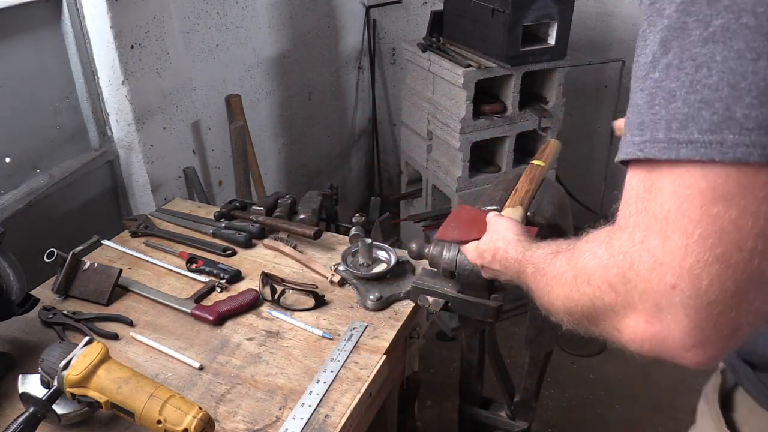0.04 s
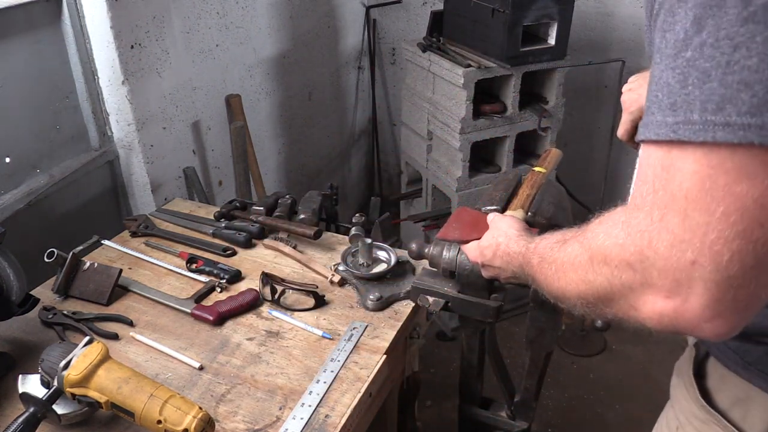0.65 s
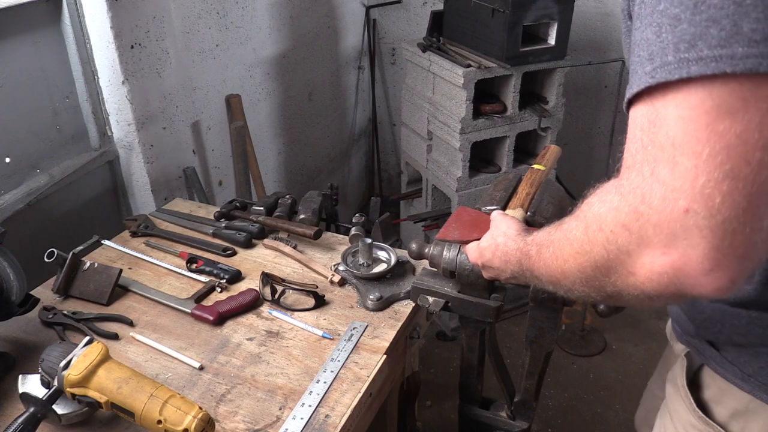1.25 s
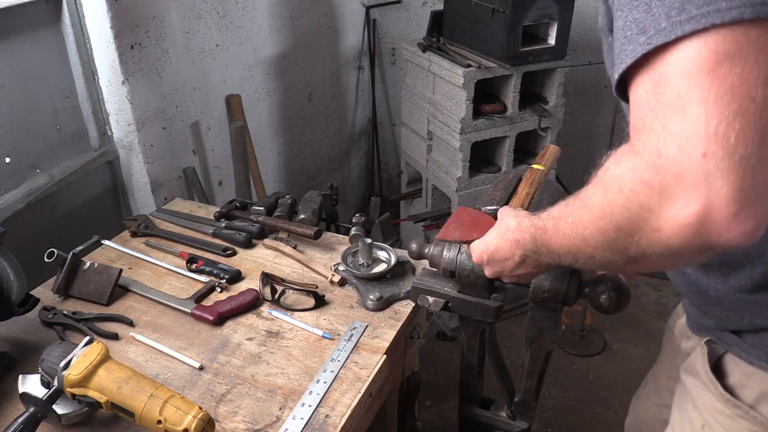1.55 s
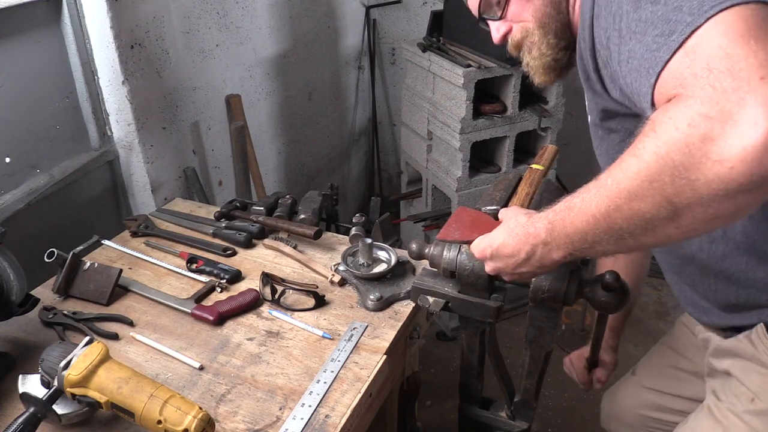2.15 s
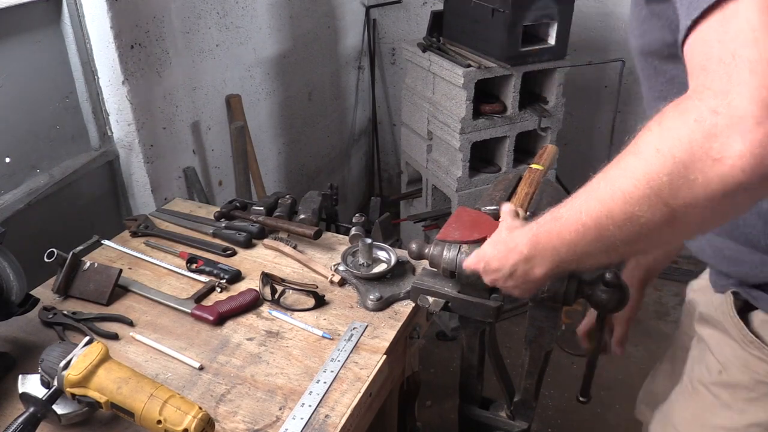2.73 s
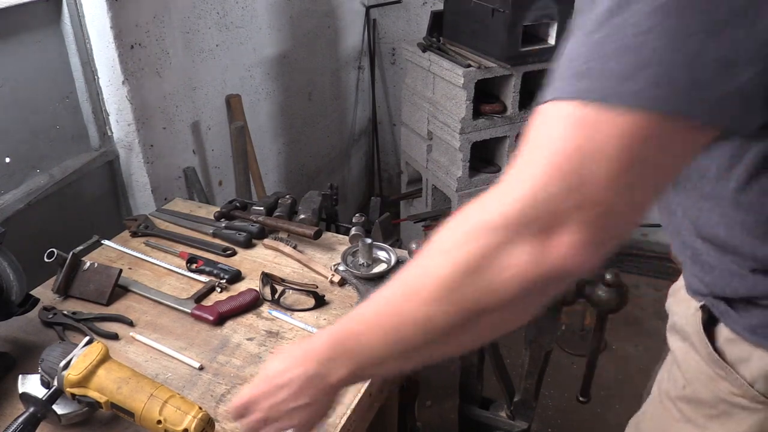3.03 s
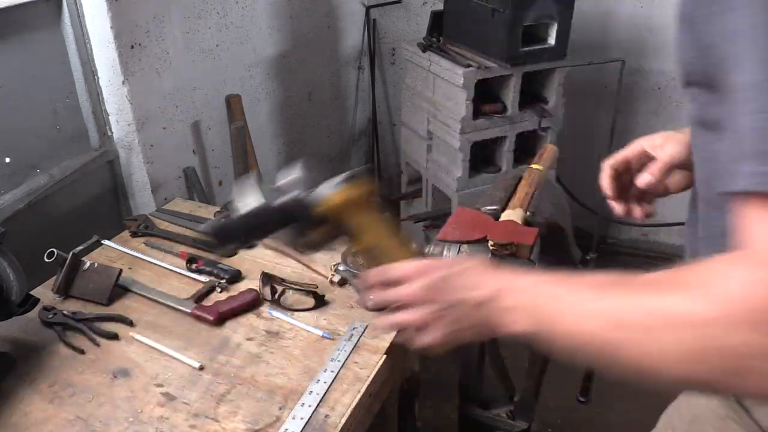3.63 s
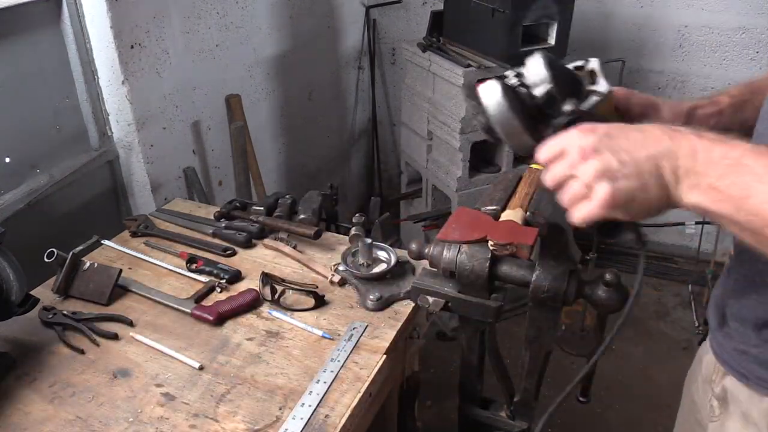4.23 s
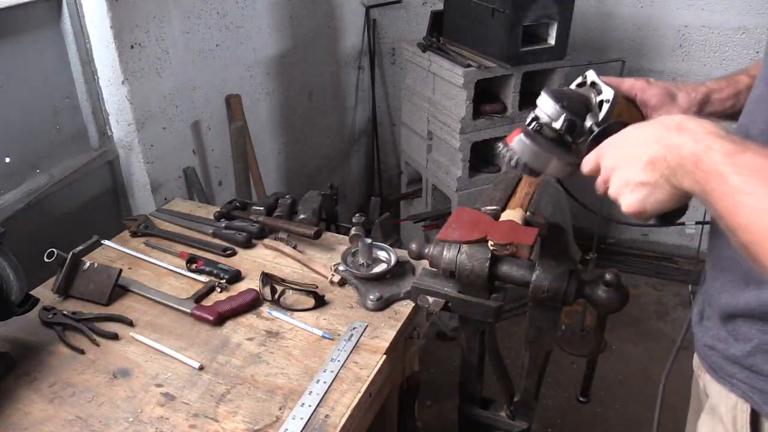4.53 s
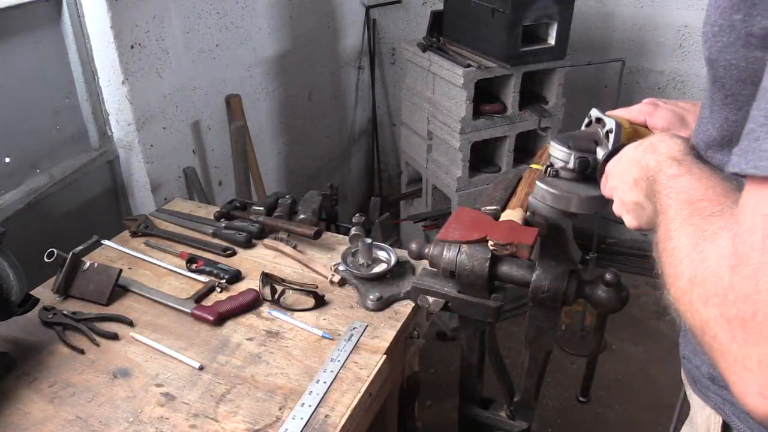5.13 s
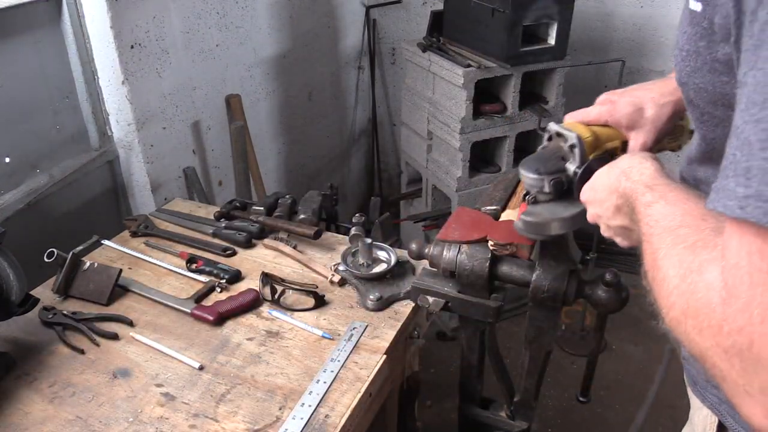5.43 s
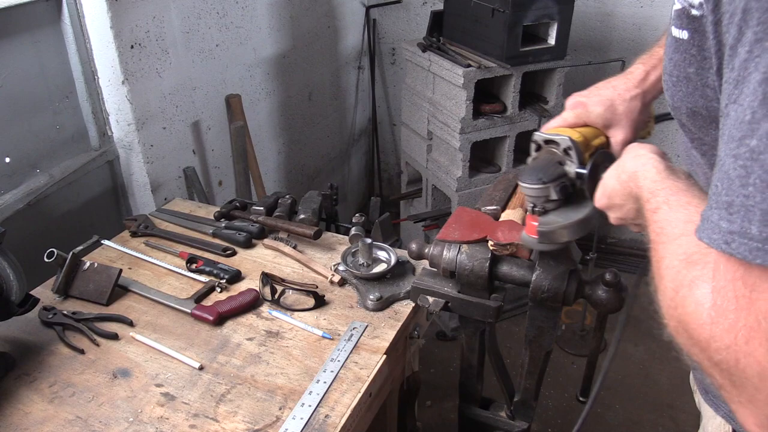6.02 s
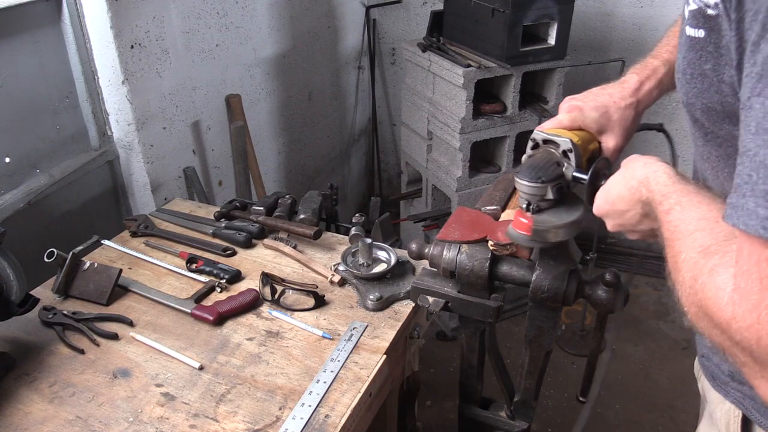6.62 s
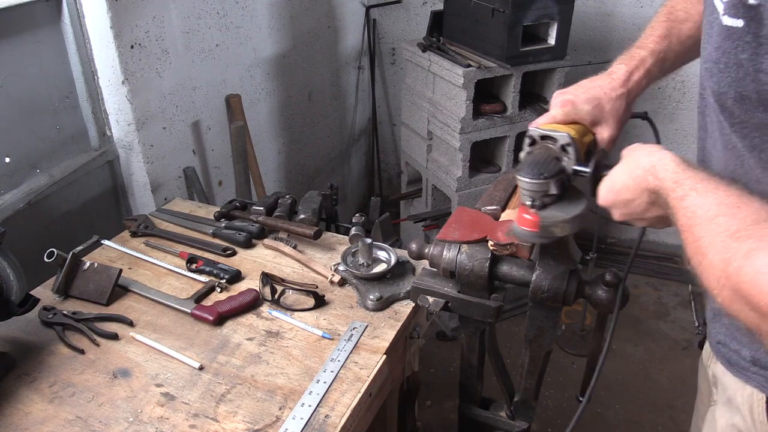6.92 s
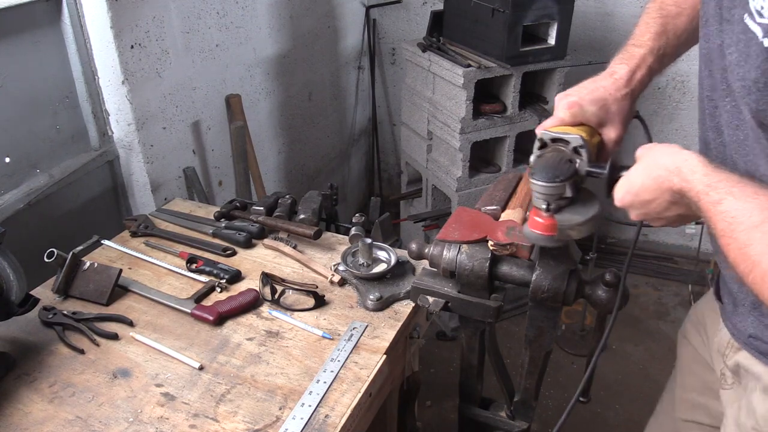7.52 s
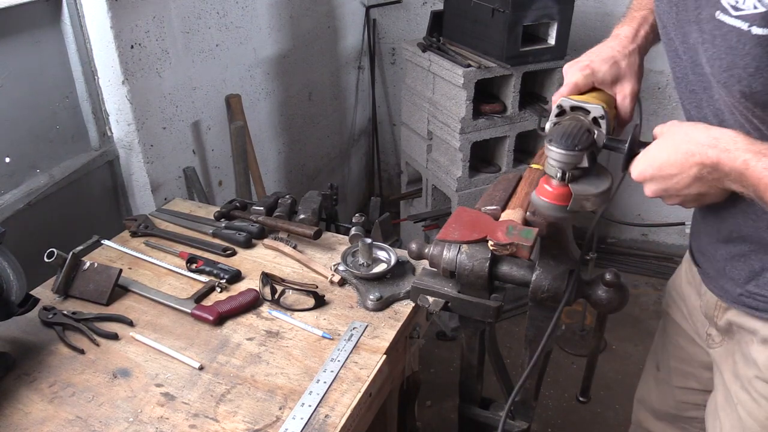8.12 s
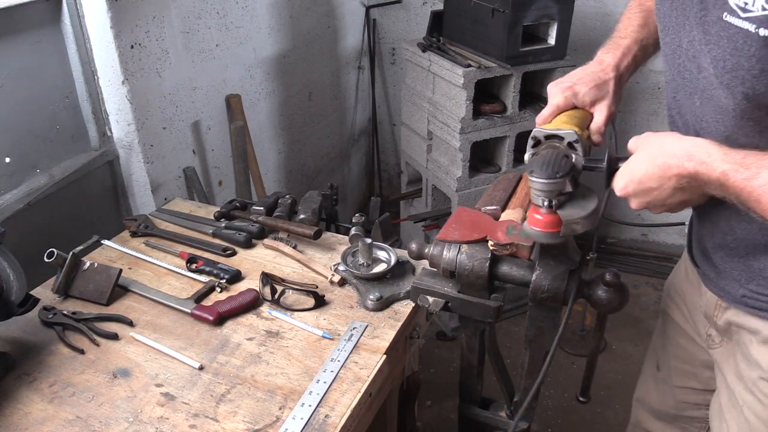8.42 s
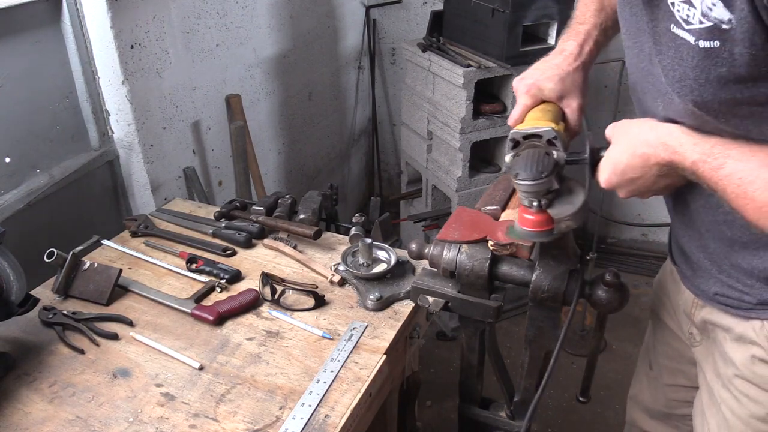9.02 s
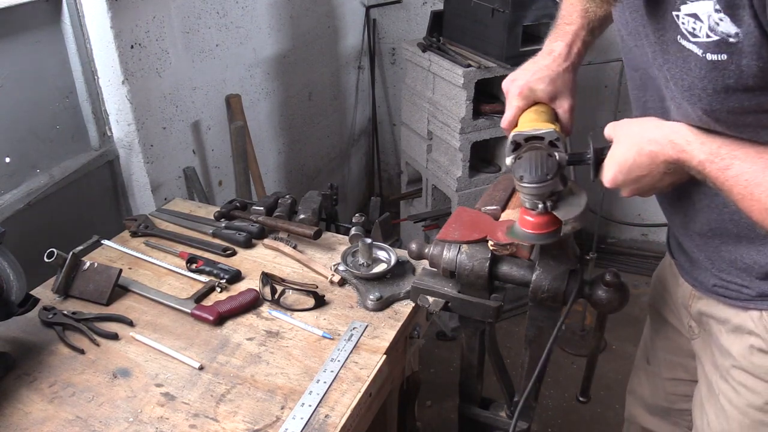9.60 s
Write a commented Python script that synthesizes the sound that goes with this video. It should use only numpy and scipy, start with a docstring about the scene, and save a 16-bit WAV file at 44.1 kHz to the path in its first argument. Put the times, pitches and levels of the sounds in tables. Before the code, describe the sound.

A vise screw turns with faint, thin squeaks while a hatchet clinks and knocks between the steel jaws. Sharper clinks come at about 2 to 2.4 seconds, the screw gives a short groan, and the handle drops with a ringing clank at 2.7. From 3 to 5 seconds an angle grinder is lifted off the bench with light knocks, scrapes and a swish of dragging cord, over a faint low hum.

At about 5.1 seconds the grinder starts with a jolt and spins up into a loud, high whine with rattling gears. From 5.7 its wire brush scratches and rasps on the blade, the pitch sagging and wavering under pressure. Near 7.9 it snags with a sharp knock and speeds up freely, then bites again from 8.5 until the end, near 10 seconds. The grinder sounds close and nearly dry; the vise carries more small workshop echo.

```python
"""A squeaking screw and steel clinks come first: a hatchet is clamped in a vise, the screw groans, the
handle drops. An angle grinder is lifted off the bench, its cord dragging, and starts with a jolt. Its
gears rattle and its motor whines; the speed sags whenever the wire brush bites into the blade.
One microphone in a small workshop: the grinder sounds close and nearly dry, the vise has more of the
room around it. A faint low hum and room noise lie behind."""
import sys
import numpy as np
from scipy import signal
from scipy.fft import rfft, irfft, next_fast_len
from scipy.io import wavfile
from scipy.ndimage import uniform_filter1d

SR = 44100
rng = np.random.default_rng(int(sys.argv[2]) if len(sys.argv) > 2 else 0)


def wrap_up_sound(samples):
    """Save the sound to the file named by the first command line argument, as 16-bit audio."""
    columns = np.atleast_2d(samples).T
    # keep every value between -1 and 1, then stretch to whole-number steps
    tamed = np.clip(columns, -1, 1)
    steps = np.round(tamed * 32767).astype(np.int16)
    wavfile.write(sys.argv[1], SR, steps)


N = 434826
TIME = np.arange(N) / SR
SWITCH_ON_S = 5.085


# spectrum of the gear case: f/Hz, relative level/dB
CASE_SPECTRUM = [(47, -89), (80, -59), (107, -36), (139, -40.5), (177, -28.5), (287, -19.5), (663, -17),
                 (864, -15.5), (1640, -12.5), (2180, -6.5), (3700, -2.5), (4220, -6), (4820, -3.5),
                 (6140, -13), (15500, -23.5)]
# resonances of case and guard: f/Hz, width/Hz, level/dB
CASE_RESONANCES = [(1113, 290, -33), (2220, 170, -36), (4190, 150, -24.5), (5600, 190, -38),
                   (6700, 204, -41.5), (8330, 660, -38.5)]

def gear_rattle(turns, running, press, throb=0.074):
    """Loose teeth clatter in the case, hardest twice a turn and a little softer under load."""
    level = amp(-13 - 1.1 * press + 0.5 * drift(16)) * np.minimum(running / 0.64, 1) ** 4
    force = 1 + throb * np.cos(4 * np.pi * turns) + throb / 2 * np.cos(2 * np.pi * turns)
    force *= amp(drift(1500) + 0.44 * drift(70))
    teeth = force * rng.standard_normal(N)
    mesh = force * wavering(32 * turns, 4, 900)
    modes = sum(amp(db) * ring(teeth, hz, width) for hz, width, db in CASE_RESONANCES)
    return level * (amp(-3) * coloured(teeth, CASE_SPECTRUM) + amp(-11) * mesh) + running * modes


# housing resonances that swell the passing whine: f/Hz, level/dB
HOUSING_RESPONSE = [(8100, -43), (8950, -18.5), (9700, -40), (10650, -44), (11600, -28), (12200, -35),
                    (13000, -30.5), (13650, -25.5), (14050, -29), (14400, -40), (15200, -36)]
# whine at the microphone as the grinder is turned about: t/s, gain/dB
WHINE_AT_MIC = [(7.5, 2), (7.9, -5), (8.5, 1), (9.55, 1), (9.78, -11)]
# low overtones, gear mesh and sidebands: multiple of the spindle speed; relative level/dB
GEAR_ORDERS = [3, 4, 5, 6, 25, 29, 31, 32, 33]
GEAR_LEVELS = [-45.5, -37.5, -42.5, -42, -52, -40, -31.5, -30.5, -29]
# how strongly the case radiates a gear tone: f/Hz, gain/dB
CASE_RESPONSE = [(100, 13), (600, -6.5), (850, 4.5), (1200, 8), (3050, -15), (3400, 10), (3750, 4),
                 (3980, -15), (4260, 5), (4520, 4), (4850, 4.5), (5200, -6)]
# rotor tones: multiple of the motor speed; level/dB at top speed
ROTOR_ORDERS = [1, 11, 12, 13, 15, 18]
ROTOR_LEVELS = [-46, -47.5, -50, -45, -47, -51]

def motor(turns, speed, running, press, gear_ratio=32 / 9, slots=29, sway=0.1278):
    """The rotor slots whine, swayed once a spindle turn, over the tones of rotor and gears."""
    rotor_turns = turns * gear_ratio
    whine_db = lookup(HOUSING_RESPONSE, speed * gear_ratio * slots) + curve(WHINE_AT_MIC)
    whine = amp(whine_db + 1.8 * drift(13)) * wavering(rotor_turns * slots, 0.166, 50)
    whine *= 1 + sway * np.sin(2 * np.pi * turns)
    unbalance = amp(-51) * wavering(turns, 0.19, 14)
    gears = sum(amp(db + lookup(CASE_RESPONSE, order * speed)) * wavering(order * turns, 0.57, 40)
                for order, db in zip(GEAR_ORDERS, GEAR_LEVELS))
    gears *= amp(-3 * press)  # the gears sing most freely without load
    bearings = sum(amp(db) * wavering(order * rotor_turns, 1.3, 160)
                   for order, db in zip(ROTOR_ORDERS, ROTOR_LEVELS))
    return whine * (running > 0) + running ** 2 * (unbalance + gears + bearings)


def spindle_speed(drag, free_speed=154.65, droop=67.7, torque=156.2, hop=22):
    """Turns/s of the spindle: a series motor pulls hardest when slow, not at all at its free speed."""
    steps = np.arange(round(SWITCH_ON_S * SR), N, hop)
    speeds = [0.]
    for braking in drag[steps[:-1]]:
        pull = torque * np.expm1((free_speed - speeds[-1]) / droop)
        speeds.append(speeds[-1] + (pull - braking) * hop / SR)
    return np.interp(np.arange(N), steps, speeds, left=0)


# two passes over the blade, the first ending in a snag at the edge: t/s, braking/(turns/s^2)
BRUSH_PASSES = [(5.513, 0), (5.706, 54), (5.763, 32), (5.905, 97), (5.958, 53), (6.392, 99), (6.432, 84),
                (6.87, 93.5), (6.914, 75.6), (7.75, 90), (7.837, 194), (7.839, 0), (8.406, 0), (8.518, 35),
                (8.756, 88.3), (9.077, 98.8), (9.86, 66.7)]

def blade_drag(rock_s=6.898, rocks=3, rocks_per_s=3.984, swing=27):
    """The blade brakes the brush; for a short spell the hand rocks it to and fro."""
    strokes = np.clip((TIME - rock_s) * rocks_per_s, 0, rocks)
    return curve(BRUSH_PASSES) - swing * np.sin(2 * np.pi * strokes)


# gear clatter under the starting torque: f/Hz, relative level/dB
JOLT_SPECTRUM = [(88, -66), (150, -40.5), (350, -8.5), (624, -12), (701, -2.5), (1800, -7.5), (2400, 2),
                 (5510, -10.5), (7080, -8.5), (8250, -23), (15000, -32)]

def starting_jolt(mains_hz=60, slack_s=0.0081, fade_db_per_s=262):
    """Each half wave of the mains slams the gears together, and they give a short rising squeal."""
    surge = unit(np.exp(0.55 * np.cos(4 * np.pi * mains_hz * (TIME - 5.0957))))
    clatter = coloured(surge * rng.standard_normal(N), JOLT_SPECTRUM)
    squeal_hz = 2700 + 16000 * np.clip(TIME - 5.165, -.03, .03)
    squeal = surge * wavering(np.cumsum(squeal_hz) / SR, 0.8, 400) * (TIME > 5.145)
    switch = amp(-25) * envelope(SWITCH_ON_S, 0.0016, slack_s, fade_db_per_s)
    slam = amp(-12) * envelope(SWITCH_ON_S + slack_s, .001, 0.066, fade_db_per_s)  # the teeth meet
    return np.maximum(switch, slam) * (clatter + 0.86 * squeal)


def run_up_growl(turns, speed):
    """While the motor gathers speed the teeth press hard and growl at the mesh pitch and its octave."""
    acceleration = uniform_filter1d(np.gradient(speed) * SR, size=2000)
    pull = np.clip(acceleration / 200, 0, 1) * (TIME > 5.2)
    mesh, octave = wavering(32 * turns, 3, 350), wavering(64 * turns, 3, 900)
    return pull * (amp(-22) * mesh + amp(-28) * octave)


# bristles on steel: f/Hz, relative level/dB
BRISTLE_SPECTRUM = [(350, -40), (600, -11.5), (1040, 1), (1620, -6.5), (2180, -5), (3840, -5), (4190, -2),
                    (5660, -3), (6100, -13), (6660, -7), (12000, -17), (15600, -50), (22000, -120)]

def brush_scratch(turns, press, strikes_per_s=9000):
    """Single wires scratch across the steel, louder the harder the brush is pressed."""
    strikes = (rng.random(N) < strikes_per_s / SR) * rng.standard_normal(N)
    strikes *= (1 + 0.203 * np.cos(4 * np.pi * turns)) * amp(0.9 * drift(60))
    return amp(-21) * press ** 1.1 * coloured(strikes, BRISTLE_SPECTRUM)


def brush_rasp(press):
    """Wires bent hard against the blade rasp in uneven patches of paint and rust."""
    wires = np.resize(noise_band(N / SR, centre_hz=3100, octaves=0.3), N)
    patches = unit(drift(35) + drift(7))
    return press ** 0.55 * amp(-27 + 2.5 * patches) * wires


def blade_boom(turns, press, blade_hz=247, width_hz=7.4):
    """The wires beat the blade twice a turn; it booms when the sagging speed meets its resonance."""
    beat = press ** 1.15 * wavering(2 * turns, 0.22, 50)
    pole, carrier = np.exp(-np.pi * width_hz / SR), np.exp(2j * np.pi * blade_hz * TIME)
    boom = 2 * (carrier * signal.lfilter([1 - pole], [1, -pole], beat / carrier)).real
    overtones = amp(-41) * wavering(4 * turns, .4, 30) + amp(-47) * wavering(6 * turns, .4, 30)
    return amp(-23.5) * boom + amp(-42) * beat + press ** 2 * overtones


# steel and tool contacts: t/s, relative level/dB, treble/dB, t60/s
STEEL_CONTACTS = [(0.113, -20.5, -12, 0.066), (0.445, -15.5, -2.5, 0.081), (1.425, -28, -1, 0.22),
                  (1.718, -31.5, 1, 0.14), (1.979, -29, 4, 0.087), (2.009, -11, -3.5, 0.091),
                  (2.154, -24.5, -5, 0.052), (2.322, -4, 3, 0.055), (2.342, -5, -3, 0.084),
                  (2.383, -9.5, -3.5, .07), (3.011, -23.5, -7.5, .12), (3.318, -25.5, -4, .07),
                  (3.402, -24.5, -9, 0.076), (3.417, -23.5, -1.5, 0.081), (3.59, -20, -7, 0.2),
                  (3.913, -23, 14, 0.03), (4.35, -24, -6.5, 0.19)]
# struck steel: f/Hz, relative level/dB
STEEL_SPECTRUM = [(71, -48), (120, -11.5), (220, -5), (372, -10), (465, 2), (592, -5), (961, -6),
                  (1110, -8), (2200, -10.5), (4030, -11.5), (4370, -9.5), (7100, -18.5), (15000, -31)]

def clinks():
    """Hard contacts set off a dense burst of steel modes, dull or bright, and ring the vise body."""
    out, t = np.zeros(N), np.arange(SR // 3) / SR
    for s, db, treble_db, t60 in STEEL_CONTACTS:
        tilt = [(300, -3 - 0.41 * treble_db), (900, 0), (2500, 0), (6000, treble_db + 1.5)]
        burst = shaped(rng.standard_normal(len(t)),
                       lambda hz: lookup(STEEL_SPECTRUM, hz) + lookup(tilt, hz))
        burst *= amp(-60 * t / t60) * np.minimum(t / 0.0012, 1)
        body = 0.36 * burst.std() * ring(burst, hz=950, width_hz=83)
        add(out, s - .001, amp(db - 9) * (burst + body))
    return out


# resonances of the vise stand: f/Hz, width/Hz, relative level/dB
STAND_RESONANCES = [(123, 25, -9), (177, 27, 0.5), (235, 17.4, 4), (322, 30, -5), (390, 12, 3),
                    (566, 11.67, -10), (1054, 100, -12)]

def screw_groan(slips_per_s=57):
    """The tightened screw slips in jerks that shake the stand."""
    level = envelope(start_s=2.47, rise_s=0.0084, hold_s=0.052, fade_db_per_s=440)
    groaning = level > .01
    slip_count = np.floor(np.cumsum(slips_per_s * groaning) / SR + 0.44)
    slips = np.diff(slip_count, prepend=0) * (1 + 0.075 * drift(60))
    slips = signal.sosfilt(signal.butter(4, 800, fs=SR, output="sos"), slips)  # grease softens each slip
    stand = sum(amp(db) * ring(slips, hz, width) for hz, width, db in STAND_RESONANCES)
    return amp(-16.5) * level * stand / stand[groaning].std()


# blows of the handle: t/s, level/dB
HANDLE_HITS = [(2.656, -19.5), (2.677, -14)]
# its modes: f/Hz, relative level/dB, t60/s
HANDLE_MODES = [(193, -9, 0.14), (445, -10.5, 0.15), (745, -1, 0.14), (890, -10, 0.079), (1120, -21, .07),
                (1596, -6, 0.092), (1950, -9, 0.076), (2550, -21, 0.083), (3461, -19, 0.076),
                (4290, -13.5, 0.05), (4950, -22.5, .06), (6350, -28, .08)]

def handle_drop(chatter_t60=0.074):
    """The sliding handle falls against its stop, chatters and rings."""
    out, t = np.zeros(N), np.arange(SR // 2) / SR
    for s, db in HANDLE_HITS:
        modes = sum(amp(level - 60 * t / t60) * np.sin(2 * np.pi * (hz * t + rng.random()))
                    for hz, level, t60 in HANDLE_MODES)
        chatter = noise_band(1, centre_hz=1900, octaves=0.52)[:len(t)] * amp(-60 * t / chatter_t60)
        add(out, s, amp(db) * (modes + 0.63 * chatter) * np.minimum(t / 0.0026, 1))
    return out


# knocks of vise stand, bench and brush guard: t/s, level/dB, f/Hz, spread/octaves, t60/s
KNOCKS = [(0.112, -24, 740, 0.29, 0.078), (0.366, -36.5, 600, 0.35, .22), (0.424, -27.5, 694, 0.56, 0.12),
          (0.591, -24, 575, 0.84, 0.13), (0.606, -19.5, 240, 0.79, .165), (1.034, -40.5, 293, 0.53, 0.13),
          (2.546, -26, 58, .19, 0.23), (2.656, -17.5, 343, 0.99, 0.22), (3.296, -33.5, 130, 0.44, 0.41),
          (3.358, -33, 260, 0.82, 0.23), (4.294, -33.5, 700, 0.96, .11), (4.614, -28, 300, 1.15, 0.23),
          (4.703, -32.5, 720, 0.68, 0.29), (7.914, -6.5, 603, 0.41, 0.067), (7.92, -23.5, 181, 0.38, 0.099)]

def thuds(rise_s=0.0022):
    """Soft, heavy blows swell briefly and die."""
    out = np.zeros(N)
    for s, db, hz, octaves, t60 in KNOCKS:
        body = noise_band(.4, hz, octaves)
        t = np.arange(len(body)) / SR
        fall = amp(-60 * t / t60) * (1 - np.exp(-t / rise_s))
        add(out, s, amp(db) * unit(body * fall) * np.sqrt(np.mean(fall ** 2)))
    return out


def cord_drag(start_s=3.985, length_s=0.243, flop_s=0.054):
    """The cord hisses over the bench edge, rubs lower and louder as it runs out, and flops down."""
    hiss, rub = noise_band(length_s, 3000, 0.59), noise_band(length_s, 1600, .55)
    flop, bench = noise_band(length_s, 115, 0.7), noise_band(length_s, 450, .85)
    out, t = np.zeros(N), np.arange(len(hiss)) / SR
    progress, left_s = t / length_s, t[-1] - t
    swish = amp(-28 - 12 * progress) * np.minimum(t / 0.058, 1) ** 2 * hiss
    swish += progress ** 1.45 * (amp(-27) * rub + amp(-35) * bench)
    swish += amp(-26) * np.clip((flop_s - left_s) / 0.0045, 0, 1) * flop
    add(out, start_s, swish * np.minimum(left_s / 0.019, 1))
    return out


# jaws, hands and grinder sliding: t/s, length/s, level/dB, f/Hz, spread/octaves
SLIDES = [(-0.1, 0.62, -55, 1200, 1.44), (1.236, .1, -53, 2000, 1.4), (1.406, .073, -40.5, 2200, 1.2),
          (1.531, .17, -50.5, 2500, 1.2), (1.8, .18, -53, 2500, 1), (2.1, 0.25, -46, 2170, .92),
          (2.789, 0.17, -49, 3060, 0.94), (3.233, .17, -47.5, 2020, 1), (3.579, 0.013, -26, 4030, .25),
          (3.584, 0.085, -34, 2460, 0.65), (3.844, 0.078, -41, 4300, 0.87),
          (3.912, 0.0033, -18, 3240, 0.76), (4.3, 0.92, -50, 870, 1.34), (4.911, 0.0037, -39, 4950, 0.39)]

def scrapes(grain_db=2.5):
    """Strokes of friction catch and slip."""
    out = np.zeros(N)
    for s, seconds, db, hz, octaves in SLIDES:
        stroke = noise_band(seconds, hz, octaves)
        add(out, s, amp(db) * stroke * np.sin(np.linspace(0, np.pi, len(stroke))))
    return out * amp(grain_db * drift(400))


# thin rings of the turning screw: f/Hz, starting level/dB
SCREW_MODES = [(2078, -51), (3068, -63), (3962, -58), (4549, -59)]
# its squeaks: t/s, length/s, level/dB, start f/Hz, end f/Hz
SCREW_SQUEAKS = [(0.017, 0.05, -53, 4100, 4400), (0.063, 0.037, -49, 4350, 5000),
                 (0.095, .02, -51, 5350, 5220), (0.174, .035, -50, 4480, 4640),
                 (0.27, .08, -57, 4030, 4000)]

def screw_spin(stop_s=0.73, fade_db_per_s=14):
    """The screw is spun in: the thread rubs in fits and squeaks, and the stand rumbles."""
    friction = rng.standard_normal(N) * amp(4.7 * drift(26))
    rings = sum(amp(db) * ring(friction, hz, width_hz=41) for hz, db in SCREW_MODES)
    out = rings * amp(-fade_db_per_s * TIME) * np.clip((stop_s - TIME) / .2, 0, 1)
    rumble = noise_band(stop_s, centre_hz=150, octaves=1)
    add(out, 0, amp(-44) * rumble * np.linspace(1, 0, len(rumble)) ** 0.2)
    roughness = unit(1 + 0.7 * drift(400))
    for s, seconds, db, start_hz, end_hz in SCREW_SQUEAKS:
        pitch = np.linspace(start_hz, end_hz, int(seconds * SR))
        squeak = np.hanning(len(pitch)) ** .5 * np.sin(2 * np.pi * np.cumsum(pitch) / SR)
        add(out, s, amp(db) * squeak * roughness[round(s * SR):][:len(pitch)])
    return out


# decay of the workshop: f/Hz, t60/s
ROOM_DECAY = [(100, 0.96), (400, 0.57), (1000, 0.99), (4000, 1), (8000, 0.86), (15000, 0.2)]

def workshop(x, early_db, tail_db, early_t60=0.11):
    """After the direct sound, quick echoes off bench and block walls reach the microphone, then a tail."""
    t = np.arange(SR) / SR
    taps = rng.choice([-1., 1.], SR) * (rng.random(SR) < 3000 / SR) * (t > .003)
    hz, frame_s, bands = signal.stft(taps, SR, nperseg=256)
    bands = bands * amp(-60 * frame_s / lookup(ROOM_DECAY, hz)[:, None])
    tail = signal.istft(bands, SR, nperseg=256)[1][:SR]
    early = rng.standard_normal(SR) * (rng.random(SR) < 900 / SR) * (t > .002)
    early *= amp(-60 * t / early_t60)
    echoes = amp(early_db) * early / np.linalg.norm(early) + amp(tail_db) * tail / np.linalg.norm(tail)
    return x + signal.fftconvolve(x, echoes)[:N]


# background hum: t/s, f/Hz, level/dB
HUM_PATH = [(0, 89.4, -48), (1.2, 86, -55), (1.5, 82.4, -65), (2.0, 77, -55), (4.1, 70.7, -65.5),
            (4.6, 74.7, -54), (5.1, 79.4, -57.5), (5.8, 80, -81)]

def low_hum():
    """A faint hum sinks in pitch, partly recovers and fades."""
    return amp(curve(HUM_PATH, column=2)) * wavering(np.cumsum(curve(HUM_PATH)) / SR, 0.19, 16)


# the quiet workshop at the microphone: f/Hz, relative level/dB
ROOM_SPECTRUM = [(18, -41), (30, -15), (69, -9), (176, 1), (337, -7), (928, -8), (1140, -17), (1370, -12),
                 (2080, -21.5), (15000, -36)]

def room_tone():
    """Steady, dull noise lies under everything."""
    return amp(-54) * coloured(rng.standard_normal(N), ROOM_SPECTRUM)


def amp(db):
    """Decibels to gain."""
    return 10 ** (np.asarray(db) / 20)


def unit(x):
    """Scales to rms 1."""
    return x / np.sqrt(np.mean(x ** 2) + 1e-20)


def curve(rows, column=1):
    """One column of a timed table at every sample."""
    rows = np.array(rows, float)
    return np.interp(TIME, rows[:, 0], rows[:, column])


def lookup(points, hz):
    """Interpolates a table over log frequency."""
    f, value = np.transpose(points)
    return np.interp(np.log(hz + 1), np.log(f + 1), value)


def shaped(x, db_at):
    """Filters x by a rule for dB over frequency; rms 1."""
    size = next_fast_len(len(x))
    gain = amp(db_at(np.fft.rfftfreq(size, 1 / SR)))
    return unit(irfft(rfft(x, size) * gain, size)[:len(x)])


def coloured(x, spectrum):
    """Filters x by a spectrum table; rms 1."""
    return shaped(x, lambda hz: lookup(spectrum, hz))


def noise_band(seconds, centre_hz, octaves):
    """Noise in one rounded hump with straight skirts; small things radiate no deep bass."""
    def db_at(hz):
        hump_db = -12 * np.hypot(1, np.log2((hz + 1) / centre_hz) / octaves)
        return hump_db - 20 * np.log10(1 + (42 / (hz + 1)) ** 4)
    return shaped(rng.standard_normal(int(seconds * SR)), db_at)


def drift(per_s):
    """Smooth random wandering of rms 1."""
    points = rng.standard_normal(int(per_s * N / SR) + 4)
    fine = signal.resample(points, 8 * len(points))
    return unit(np.interp(np.linspace(0, len(fine) - 1, N), np.arange(len(fine)), fine))


def wavering(cycles, blur, per_s):
    """A tone of rms 1 whose strength and phase flutter."""
    angle = (2 * np.pi * ((cycles + rng.random()) % 1)).astype(np.float32)
    return unit((1 + blur * drift(per_s)) * np.sin(angle) + blur * drift(per_s) * np.cos(angle))


def ring(x, hz, width_hz):
    """A single resonance; rms 1."""
    r = np.exp(-np.pi * width_hz / SR)
    return unit(signal.lfilter([1, 0, -1], [1, -2 * r * np.cos(2 * np.pi * hz / SR), r * r], x))


def envelope(start_s, rise_s, hold_s, fade_db_per_s):
    """Linear attack, hold, steady fade."""
    t = TIME - start_s
    return np.clip(t / rise_s, 0, 1) * amp(-fade_db_per_s * np.clip(t - hold_s, 0, 1))


def add(mix, s, sound):
    """Lays a sound into the mix at time s."""
    start = round(s * SR)
    sound = sound[max(-start, 0):]
    part = mix[max(start, 0):][:len(sound)]
    part += sound[:len(part)]


def scene(firm_drag=90):
    """Vise work and grinder at one microphone, the same on both channels."""
    drag = blade_drag()
    speed = spindle_speed(drag)
    turns, running = np.cumsum(speed) / SR, speed / speed.max()
    press = np.clip(uniform_filter1d(drag, size=3500) / firm_drag, 1e-6, 1.3)  # springy wires soften it
    vise_work = clinks() + thuds() + scrapes() + screw_spin() + screw_groan() + handle_drop()
    handling = workshop(vise_work, early_db=-6.5, tail_db=-10)
    handling += workshop(cord_drag(), early_db=-13, tail_db=-17.5)
    clatter = gear_rattle(turns, running, press) + starting_jolt()
    clatter += run_up_growl(turns, speed) + brush_rasp(press)
    low_cut = signal.butter(3, 170, "high", fs=SR, output="sos")  # a small case radiates no bass
    grinder = workshop(signal.sosfilt(low_cut, clatter), early_db=-14, tail_db=-20)
    grinder += motor(turns, speed, running, press) + brush_scratch(turns, press)
    grinder += blade_boom(turns, press)
    mono = handling + grinder + low_hum() + room_tone()
    return np.array([mono, mono])


def record(dry, edge_hz=15800):
    """Behind the microphone, peaks clip at full scale and the top treble is cut."""
    low_pass = signal.firwin(701, edge_hz, window=("kaiser", 9), fs=SR)
    return signal.oaconvolve(np.clip(dry, -1, 1), low_pass[None], "same")


dry = scene()
out = record(dry)
wrap_up_sound(out)
```